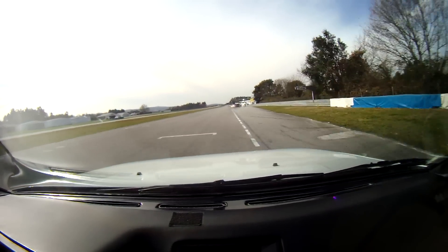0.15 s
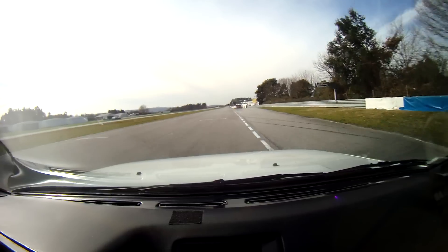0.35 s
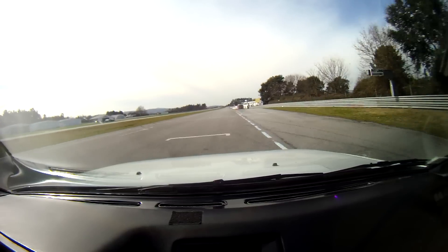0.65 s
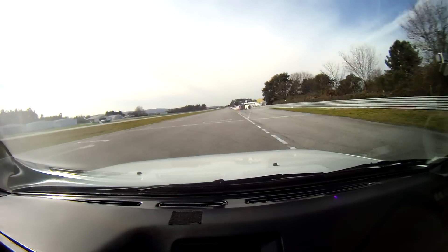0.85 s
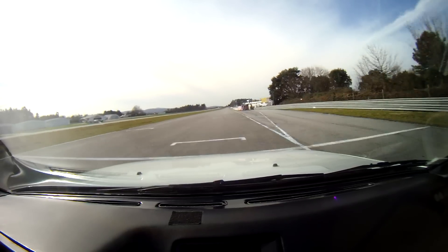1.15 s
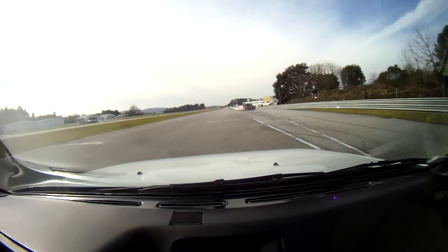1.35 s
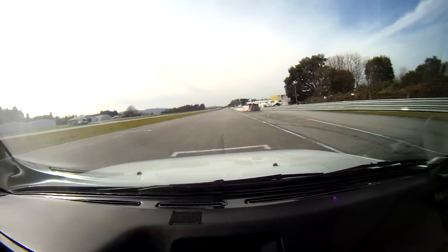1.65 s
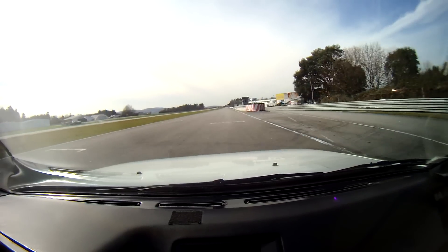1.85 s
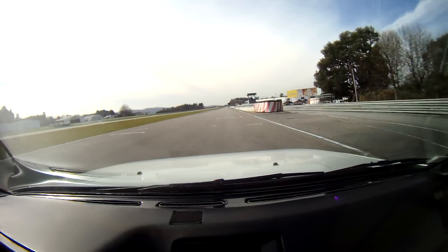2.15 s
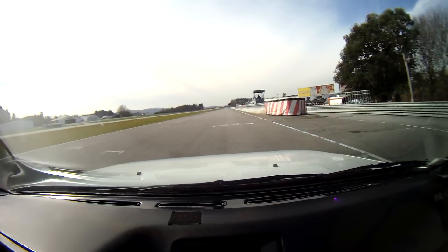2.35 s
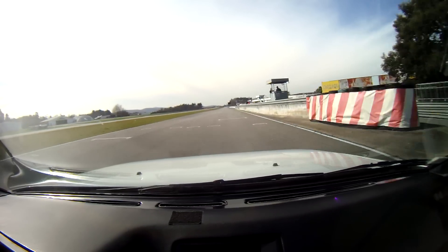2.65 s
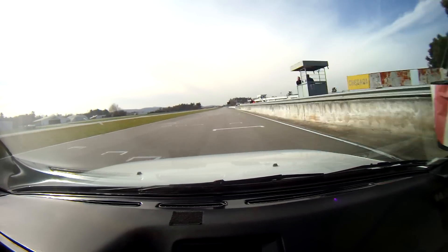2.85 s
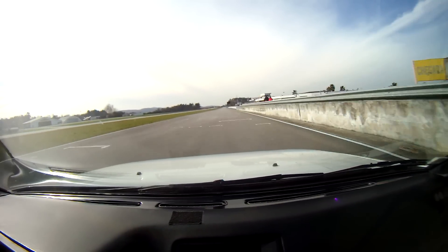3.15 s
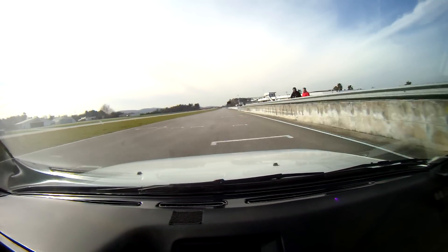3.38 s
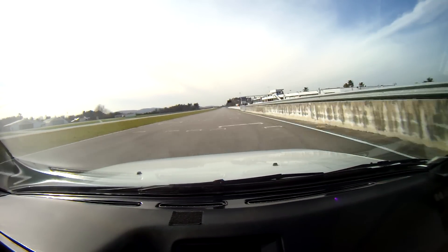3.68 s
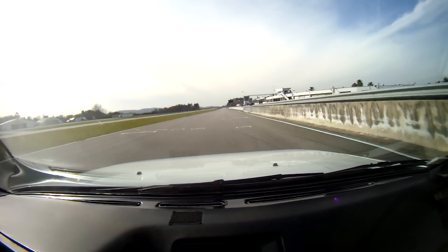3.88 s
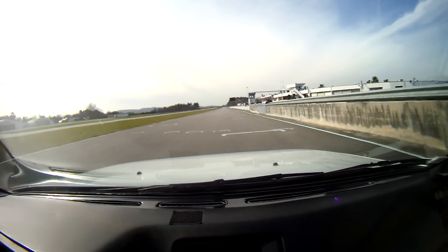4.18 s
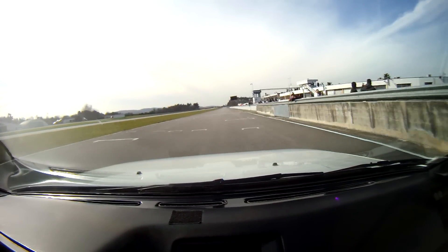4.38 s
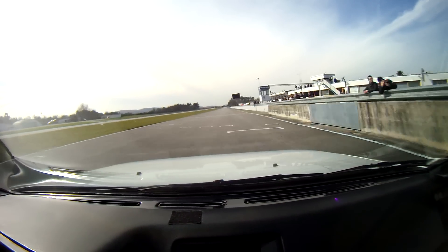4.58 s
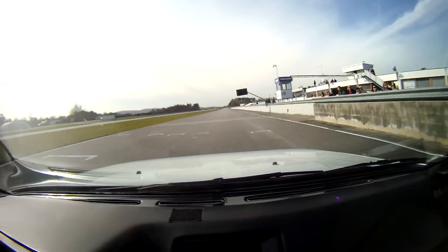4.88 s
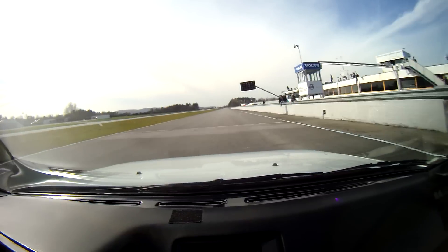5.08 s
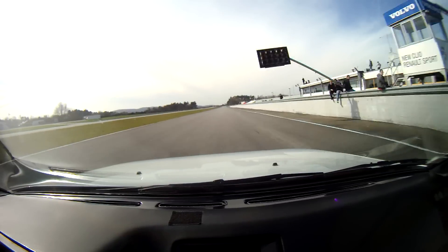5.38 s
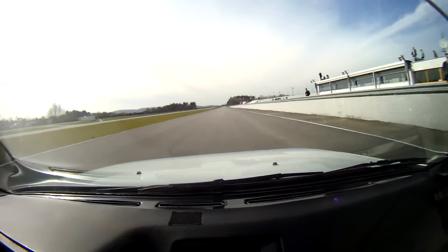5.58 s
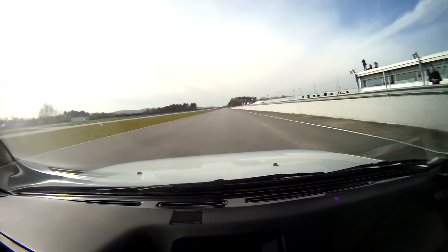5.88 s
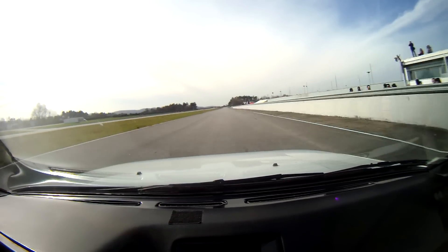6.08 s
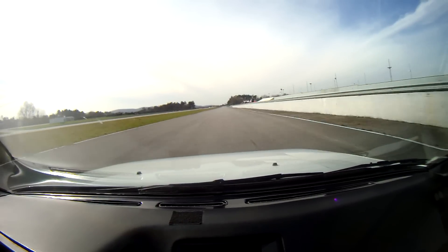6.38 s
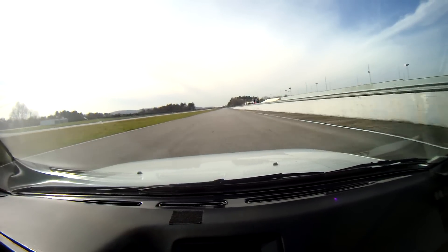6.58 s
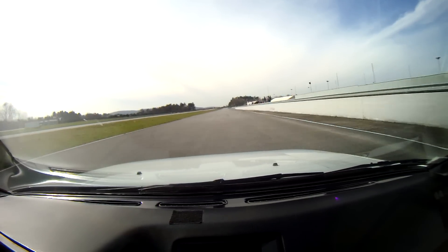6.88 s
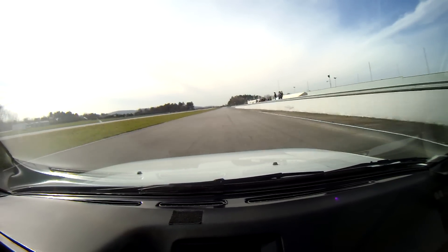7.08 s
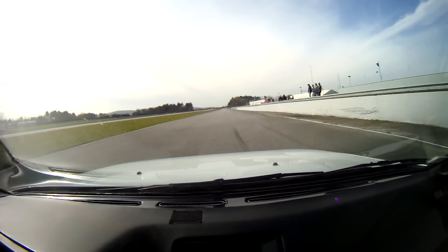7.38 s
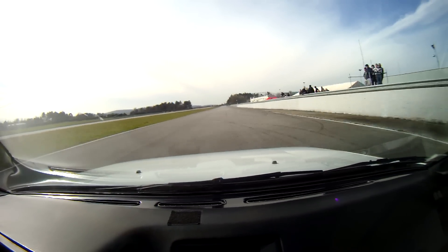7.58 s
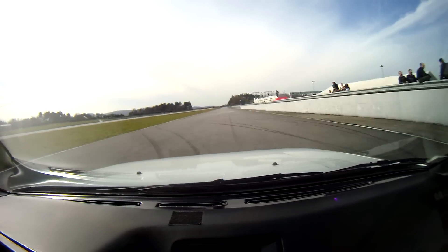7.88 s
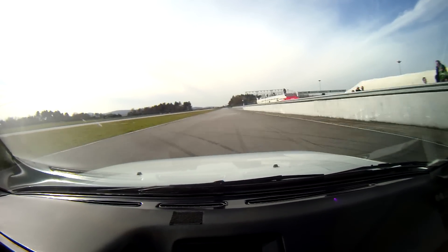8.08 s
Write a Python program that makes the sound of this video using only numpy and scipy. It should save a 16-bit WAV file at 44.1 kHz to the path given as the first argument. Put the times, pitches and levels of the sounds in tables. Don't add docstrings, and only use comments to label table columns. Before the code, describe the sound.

Close inside a car cabin on a race straight, a four-cylinder engine drones hard at high revs while a plastic camera mount buzzes and rattles, crackling with overload. Hard knocks crowd in, the revs rise, then drop at a gear shift. The next gear is cleaner and quieter, a climbing hum over wheel throb and low road rumble, until rattles and knocks return at the end.

```python
import sys
import numpy as np
from scipy import signal
from scipy.fft import rfft, irfft, next_fast_len
from scipy.io import wavfile
from scipy.ndimage import map_coordinates

SR = 44100
rng = np.random.default_rng(int(sys.argv[2]) if len(sys.argv) > 2 else 0)


def inscribe(sig):
    pcm = np.round(np.clip(np.atleast_2d(sig).T, -1, 1) * 32767)
    wavfile.write(sys.argv[1], SR, pcm.astype(np.int16))


def how_loud(loudness_db):
    steps = np.asarray(loudness_db, float) / 20
    return 10 ** steps


N = 363384


def unit(x):
    return x / np.sqrt(np.mean(x ** 2) + 1e-20)


def curves(rows):
    times_s, *columns = np.transpose(rows)
    return [np.interp(np.arange(N) / SR, times_s, column) for column in columns]


def wobble(rate):
    points = rng.standard_normal(int(N * rate / SR) + 4)
    return map_coordinates(points, [np.arange(N) * rate / SR])


def filtered(x, response):
    size = next_fast_len(N + SR // 2)
    hz = np.fft.rfftfreq(size, 1 / SR)
    return irfft(rfft(x, size) * response(hz), size)[..., :N]


def noise(spectrum):
    points_hz, points_db = np.transpose(spectrum)

    def colour(hz):
        return how_loud(np.interp(np.log(hz + 1), np.log(points_hz + 1), points_db))

    return unit(filtered(rng.standard_normal(N), colour))


def engine():
    # start_s, firing_hz, firing_db, order_3_of_4_db, half_order_db, double_db
    engine_points = [(0.0, 237.2, -18, -35, -15, -29), (0.04, 244.4, -24, -36, -43, -23.5),
                     (0.09, 245.2, -12.5, -29, -27, -20), (0.11, 245.1, -26, -35, -17, -34),
                     (0.18, 246.1, -17, -36, -42, -17.5), (0.2, 246.1, -19, -25, -35, -37),
                     (0.23, 246.4, -14.5, -44, -33, -21), (0.25, 246.2, -18, -34, -34, -28),
                     (0.32, 246.1, -20, -50, -22, -26.5), (1.28, 262.2, -18.5, -51, -26, -26.5),
                     (1.35, 275.7, -28, -34, -22, -35), (1.37, 277.2, -26, -26, -38, -29),
                     (1.42, 265.3, -19, -40, -21.5, -35), (1.74, 268.5, -21, -31, -23.5, -27),
                     (1.77, 267.6, -28, -53, -15.5, -34), (1.81, 268.2, -23.5, -33, -23.5, -26.5),
                     (2.22, 275.7, -26.5, -31.5, -24, -30), (2.36, 275.1, -32, -51, -36, -43),
                     (2.5, 255.8, -38, -32, -26.5, -42), (2.59, 244.9, -28.5, -46, -31, -51),
                     (2.75, 223.3, -28.5, -46, -31, -43), (2.84, 211.8, -26, -44, -29, -36),
                     (2.87, 210.0, -31, -57, -31, -45), (2.89, 206.2, -29, -25.5, -29, -67),
                     (2.94, 204.3, -19, -24, -30, -39), (2.98, 203.1, -26, -33, -31, -57),
                     (3.1, 203.7, -23.5, -29, -37, -48), (3.58, 214.4, -24.5, -28, -40.5, -54),
                     (4.06, 219.8, -25, -25, -39, -42), (4.61, 224.1, -28.5, -23.5, -32, -52),
                     (4.63, 225.1, -33, -23, -35, -42), (4.73, 224.9, -28.5, -29, -38, -55),
                     (4.8, 213.6, -27, -34, -33, -54), (4.93, 209.0, -24, -27.5, -38, -54),
                     (5.16, 200.3, -28.5, -24, -43, -45), (5.23, 227.8, -31, -33, -38, -46),
                     (5.37, 230.8, -30, -28, -33, -47), (6.49, 237.8, -30, -29.5, -36, -43.5),
                     (7.07, 243.5, -27, -26.5, -44.5, -43.5), (7.16, 243.8, -27, -25.5, -33, -43),
                     (7.37, 243.7, -28, -26, -36, -45), (7.41, 244.3, -28, -24, -26, -44),
                     (7.44, 241.5, -32, -27, -40, -47), (7.48, 235.0, -29, -26, -35, -38.5),
                     (7.6, 235.6, -28, -22, -41, -40), (7.62, 235.9, -28, -36, -35, -40),
                     (7.71, 242.2, -28, -24, -32, -36), (7.76, 240.9, -26, -27, -33, -55),
                     (7.8, 235.8, -25.5, -23, -42, -35.5), (7.92, 234.6, -26.5, -27.5, -44, -37.5),
                     (8.15, 241.1, -26.5, -29, -35, -32), (8.22, 234.5, -35, -28, -37, -32),
                     (8.24, 235.6, -36, -30, -14, -28)]
    # multiple of the cycle rate, level_db relative to the firing tone
    weak_orders = [(1, -11), (5, -15), (6, -19), (7, -20.5), (9, -20), (10, -25.5), (11, -24.5),
                   (12, -26.5), (14, -26.5), (16, -26), (20, -26), (22, -24.5)]
    firing_hz, firing_db, three_db, half_db, double_db = curves(engine_points)
    cycle = np.cumsum(firing_hz / 4) / SR
    orders = [(4, firing_db), (3, three_db), (2, half_db), (8, double_db)]
    orders += [(round(multiple), firing_db + db) for multiple, db in weak_orders]
    hum = np.zeros(N)
    for multiple, db in orders:
        swell = np.sqrt(2) * how_loud(db + 1.5 * wobble(12))
        turns = multiple * cycle + rng.random()
        hum += swell * np.sin(2 * np.pi * turns + .25 * wobble(25))
    return cycle, hum


def mount(hz):
    # pitch_hz, width_hz, level_db
    resonances = [(520, 120, -9.5), (760, 100, -14), (1080, 90, -12.5), (1350, 300, -2.5), (1570, 170, 3.5),
                  (2050, 500, -6), (2700, 500, -14), (4100, 500, -35.5)]
    modes = 0
    for k, (pitch, width, db) in enumerate(resonances):
        sign = (-1) ** k
        modes += sign * how_loud(db) * 1j * hz * width / (pitch * pitch - hz * hz + 1j * hz * width)
    return modes / (1 + 1j * hz / 3500) ** 2


def rattle(cycle, level_db):
    cylinder_db = [-3.5, -7.5, -7.5, -7.5]
    fired = np.flatnonzero(np.diff(np.floor(4 * cycle)) > 0)
    luck = rng.standard_normal((len(fired), 2))
    late = np.round(.00025 * SR * luck[:, 0]).astype(int)
    at = np.clip(fired + late, 0, N - 1)
    strength = how_loud(np.resize(cylinder_db, len(fired)) + 3.5 * luck[:, 1] + 3 * wobble(22)[at])
    jolts = filtered(np.bincount(at, strength, N), mount)
    gate = how_loud(5 * np.cos(2 * np.pi * cycle - .6) + 3 * wobble(30) + 2.5 * wobble(150))
    chatter = filtered(gate * rng.standard_normal(N), mount)
    return how_loud(level_db) * unit(.7 * unit(jolts) + .7 * unit(chatter))


def knocks():
    # start_s, peak_db
    hard_knocks = [(1.4602, -4.5), (1.5355, -4.5), (1.6293, 1), (1.764, -7.5), (1.7934, -9), (1.8084, -4),
                   (1.8568, -6.5), (1.9027, -14), (1.987, -7.5), (2.0015, -9), (2.0309, -4), (2.0753, -8),
                   (2.1192, -6), (2.1337, -2), (2.2369, -6), (2.2509, 0.5), (2.2913, -5), (2.6565, -12),
                   (2.7727, -14), (2.882, -2), (2.9099, -13), (2.9603, -11.5), (3.0022, -12), (3.0261, -14),
                   (3.5928, -13.5), (3.6717, -14), (3.747, -2.5), (3.9435, -10), (4.0458, -22),
                   (4.1815, -13), (4.2593, -11.5), (4.4714, -14), (4.5098, -15), (4.5482, -12),
                   (4.643, -12.5), (4.7782, -17), (4.8265, -20), (4.9762, -16), (5.0041, -9.5),
                   (5.1353, -11.5), (5.2102, -9.5), (5.285, -15), (5.5265, -16.5), (6.8499, -9),
                   (6.9208, -13.5), (6.9911, -12), (7.027, -13), (7.0974, -3), (7.2381, -11), (7.3423, -9),
                   (7.3568, -5), (7.4132, -26), (7.4306, -14.5), (7.5, -4), (7.5518, -4), (7.5823, -6.5),
                   (7.6117, -14), (7.6217, -7), (7.6865, -11.5), (7.7589, -10), (7.7773, -7), (7.8287, -3),
                   (7.8981, -11.5), (7.9504, -7), (7.9664, -8), (8.0173, -9), (8.0308, -9.5), (8.0986, -5),
                   (8.1799, -9), (8.2059, -8)]
    t = np.arange(SR // 50) / SR
    push = np.zeros(N + SR)
    for start, db in hard_knocks:
        fade = how_loud(db + 12.5 - 60 * t / .03)
        push[round(start * SR):][:len(t)] += fade * rng.standard_normal(len(t))
    return filtered(push[:N], mount)


def drone(level_db):
    # pitch_hz, level_db (per Hz)
    drone_colour = [(53, -42.5), (90, -10.5), (219, -10), (268, -14.5), (430, -19), (544, -20), (900, -22),
                    (1070, -17), (1650, -26), (2430, -26), (5000, -56.5), (6500, -91), (11000, -120)]
    return how_loud(level_db + 1.5 * wobble(15)) * noise(drone_colour)


def bumps():
    # start_s (middle of the push), push_db, direction (+1 or -1), half_swing_s
    road_bumps = [(.13, -2, -1, .025), (1.725, -5, -1, .04), (1.78, -8.5, 1, .025), (2.31, 4.5, 1, .022),
                  (2.335, -0.5, -1, .022), (2.365, -9.5, 1, .02), (3.52, -12.5, -1, .018),
                  (3.54, -1.5, 1, .02), (4.765, 0, 1, .022), (4.816, 1.5, -1, .03), (4.85, -1, 1, .028),
                  (4.881, 5, -1, .022)]
    t = np.arange(N) / SR
    out = np.zeros(N)
    for middle, db, way, swing in road_bumps:
        shape = np.cos(np.pi * np.clip((t - middle) / swing, -.5, .5)) ** 2
        out += np.sign(way) * how_loud(db) * shape
    return out


def road():
    # start_s, wheel_turns_hz, throb_db, rumble_db
    road_points = [(0.0, 20.2, -9, -21), (0.16, 20.4, -4, -21), (0.44, 20.7, -16, -29.5),
                   (0.8, 21.2, -14.5, -27.5), (1.24, 21.1, -6, -28.5), (1.31, 21.1, -17, -16),
                   (1.37, 21.2, -11, -22), (1.44, 21.2, -3.5, -25.5), (1.61, 21.2, -11, -21),
                   (1.65, 21.2, -24, -18.5), (1.77, 21.2, -6.5, -19.5), (1.86, 21.2, -12.5, -24.5),
                   (2.27, 21.7, -14, -20.5), (2.36, 21.9, -11.5, -15), (2.75, 21.9, -11.5, -22),
                   (2.96, 21.8, -15.5, -21), (2.98, 21.8, -16, -19.5), (3.39, 22.7, -15.5, -28.5),
                   (3.56, 23.0, -6, -20), (3.65, 23.3, -21.5, -18.5), (3.74, 23.7, -4, -19),
                   (3.95, 24.1, -15, -24), (4.54, 24.6, -13.5, -29), (4.75, 24.6, -14, -14.5),
                   (5.07, 24.5, -14, -19.5), (5.12, 24.6, -21.5, -19.5), (5.23, 24.5, -26, -22.5),
                   (5.65, 24.6, -22.5, -23), (5.76, 24.5, -28, -24.5), (5.97, 25.1, -11.5, -22.5),
                   (6.01, 24.9, -22.5, -25.5), (6.42, 25.8, -15, -23), (6.89, 25.9, -13, -21.5),
                   (6.97, 26.8, -25.5, -20), (7.09, 26.9, -12, -19), (7.16, 27.0, -25, -28),
                   (7.27, 27.1, -16.5, -16.5), (7.41, 27.3, -19.5, -23), (7.6, 27.3, -12.5, -20.5),
                   (7.73, 28.6, -23, -25), (7.87, 28.4, -28, -23), (7.92, 27.9, -17, -15.5),
                   (8.01, 27.9, -11, -14), (8.15, 27.1, -17, -26), (8.24, 27.3, -1.5, -24)]
    # pitch_hz, level_db (per Hz)
    rumble_colour = [(3.5, -34), (6.0, -1.5), (28, 3.5), (39, -2.5), (81, -14), (118, -25), (135, -24),
                     (158, -14.5), (200, -30.5), (260, -57), (440, -120)]
    wheel_hz, throb_db, rumble_db = curves(road_points)
    wheel_turns = np.cumsum(wheel_hz) / SR
    throb = np.sqrt(2) * how_loud(throb_db) * np.sin(2 * np.pi * wheel_turns + .4 * wobble(4))
    rumble = how_loud(rumble_db + 5.5 + 1.5 * wobble(6)) * noise(rumble_colour)
    return throb + rumble + bumps()


def scene():
    # start_s, mount_rattle_db, body_drone_db
    shake_points = [(0.0, -5.5, -15), (0.04, -6.5, -27), (0.11, -10, -21.5), (0.23, -7, -21),
                    (0.25, -6.5, -28), (0.6, -5.5, -25.5), (1.4, -7, -22.5), (1.42, -12, -22),
                    (1.47, -9.5, -25), (1.7, -17, -27), (1.84, -16, -34.5), (1.86, -15, -28.5),
                    (1.97, -15, -25.5), (1.99, -14, -19.5), (2.02, -23.5, -28.5), (2.04, -16, -28),
                    (2.09, -12, -28), (2.11, -20.5, -27), (2.13, -16.5, -24), (2.18, -16.5, -25.5),
                    (2.27, -22, -39), (2.29, -10, -26.5), (2.32, -17.5, -33), (2.34, -34, -36.5),
                    (2.54, -50.5, -39), (2.59, -30.5, -38), (2.64, -35.5, -35), (2.66, -14.5, -36),
                    (2.73, -30, -36), (2.8, -17, -43), (2.82, -28, -28), (2.87, -20, -32), (2.94, -31, -38),
                    (2.96, -16.5, -36), (2.98, -43, -37.5), (3.01, -33.5, -39), (3.08, -36, -39),
                    (3.44, -36.5, -38.5), (3.76, -31.5, -34), (3.79, -33, -38.5), (3.92, -28.5, -39),
                    (4.27, -31, -38.5), (4.45, -37.5, -36.5), (4.47, -27, -31), (4.5, -49, -42),
                    (4.52, -31.5, -35), (4.56, -35, -34.5), (5.09, -32, -37.5), (5.3, -37.5, -32.5),
                    (5.32, -37.5, -39), (5.8, -35.5, -39.5), (5.97, -38.5, -36.5), (7.07, -31.5, -36),
                    (7.09, -24.5, -34), (7.21, -33, -37), (7.25, -27, -30), (7.32, -25, -32),
                    (7.37, -21.5, -35), (7.41, -29, -38), (7.44, -21.5, -30), (7.48, -31, -33),
                    (7.5, -18.5, -30), (7.53, -28, -33), (7.55, -22, -39), (7.6, -37, -28),
                    (7.62, -21, -29), (7.66, -28, -33), (7.71, -20.5, -27), (7.76, -26, -29),
                    (7.8, -18.5, -38), (7.85, -20, -30), (7.87, -21.5, -32), (7.96, -17.5, -39),
                    (8.01, -23.5, -31), (8.03, -14.5, -29), (8.08, -21, -31), (8.1, -19, -31),
                    (8.24, -18.5, -24)]
    rattle_db, drone_db = curves(shake_points)
    cycle, hum = engine()
    mix = hum + rattle(cycle, rattle_db) + knocks() + drone(drone_db) + road()
    return mix[None]


def roll_off(x):
    return signal.sosfilt(signal.butter(12, 15720, fs=SR, output="sos"), x)


def record(dry):
    top, hardness = .7, 14
    clipped = dry / (1 + np.abs(dry / top) ** hardness) ** (1 / hardness)
    coupled = filtered(clipped, lambda hz: 1j * hz / (1.2 + 1j * hz))
    hiss = how_loud(-86.5) * rng.standard_normal(dry.shape)
    return roll_off(coupled + hiss)


dry = scene()
out = record(dry)
inscribe(out)
```